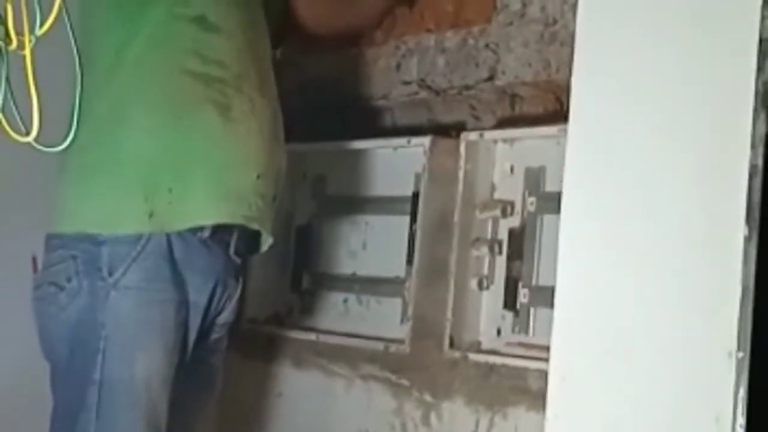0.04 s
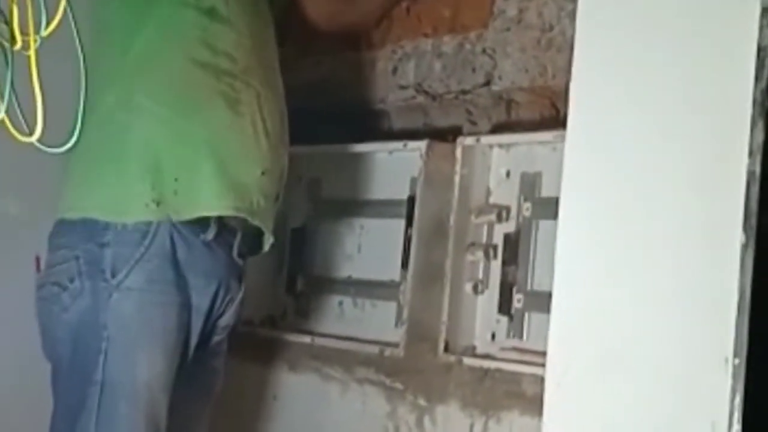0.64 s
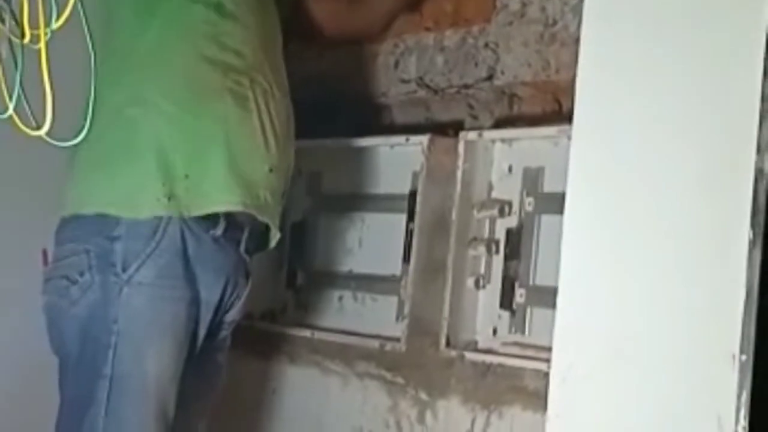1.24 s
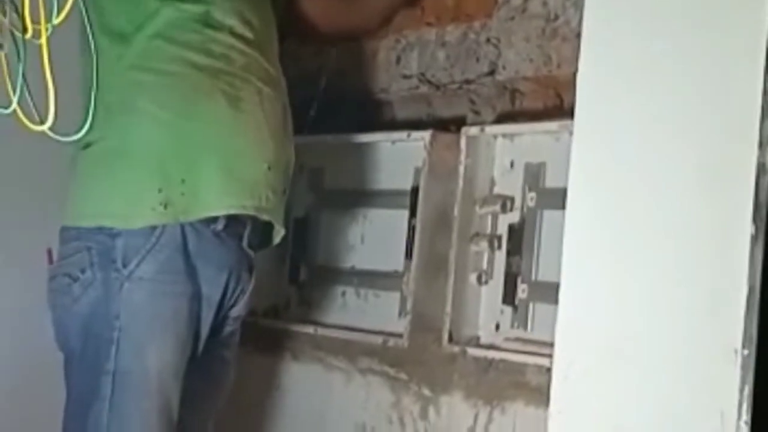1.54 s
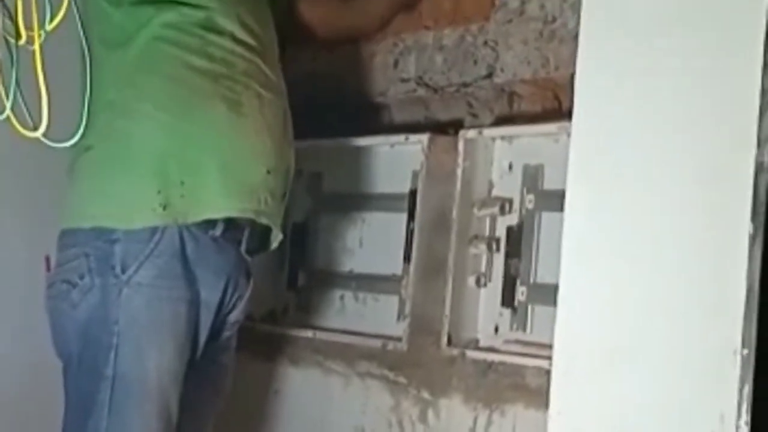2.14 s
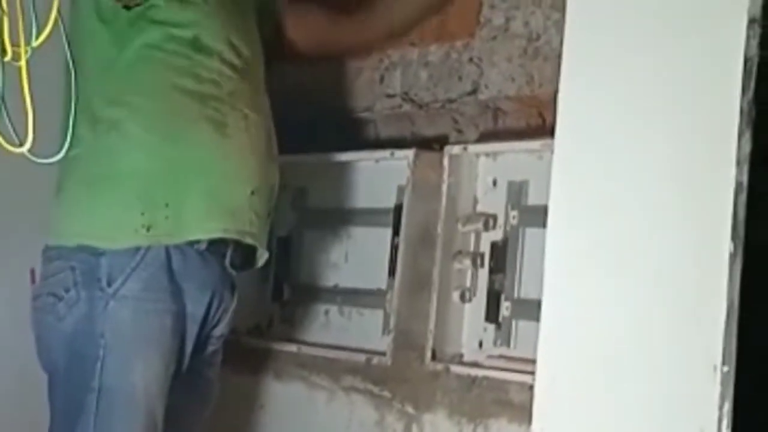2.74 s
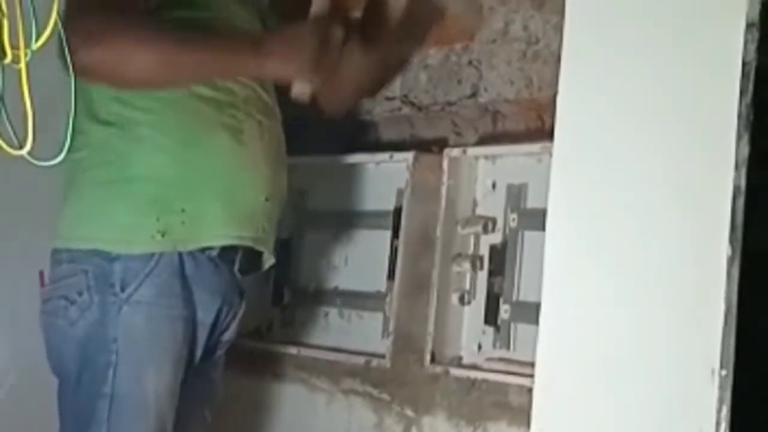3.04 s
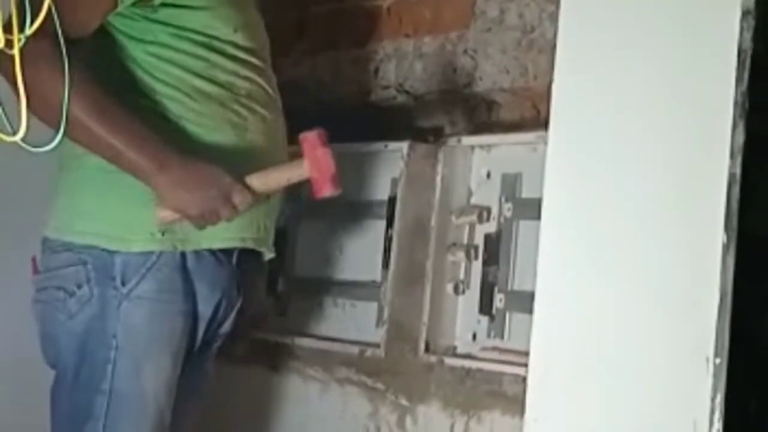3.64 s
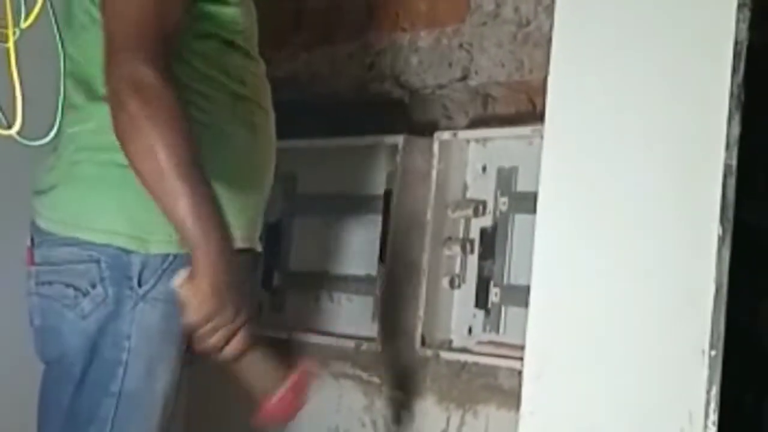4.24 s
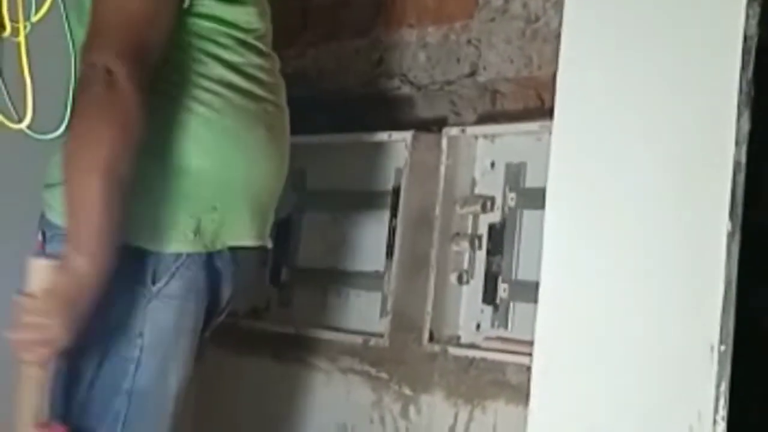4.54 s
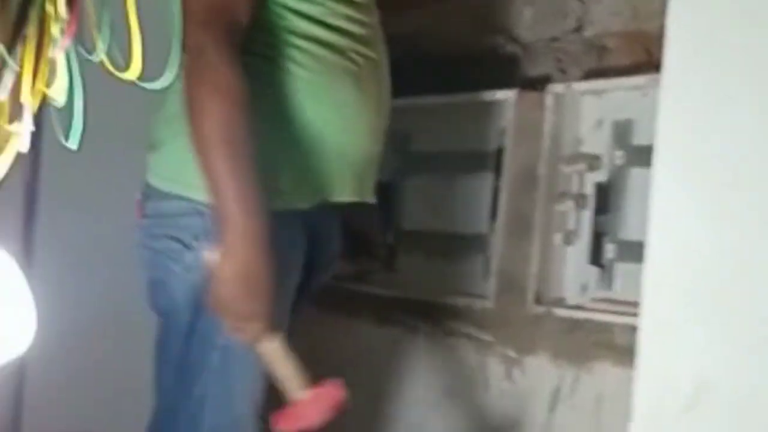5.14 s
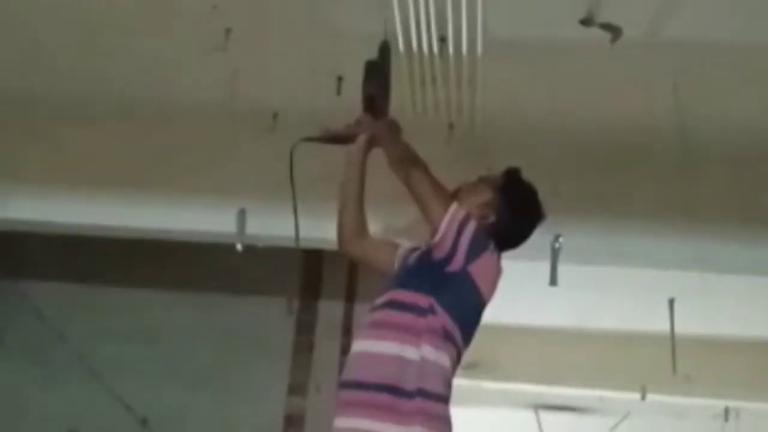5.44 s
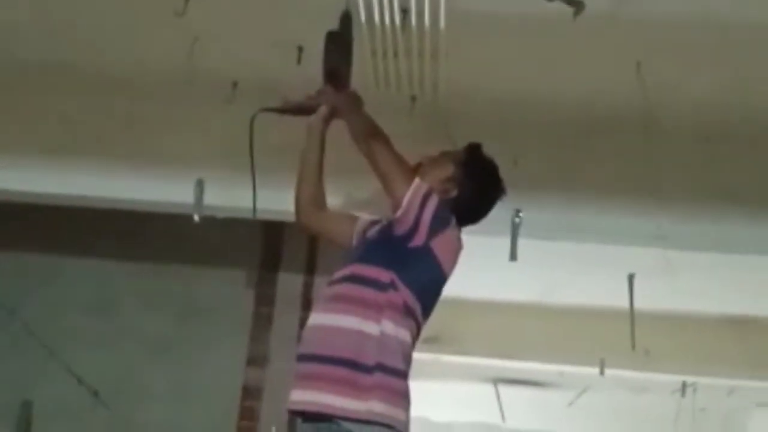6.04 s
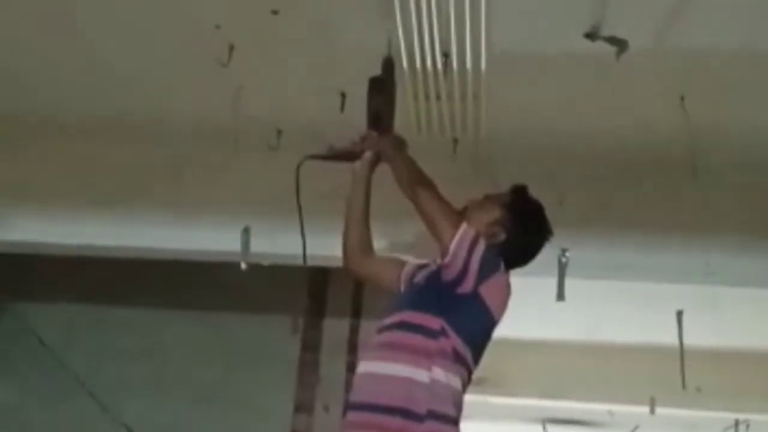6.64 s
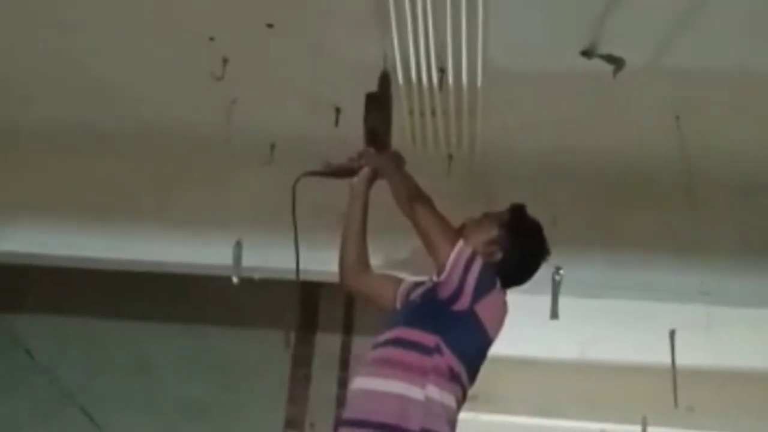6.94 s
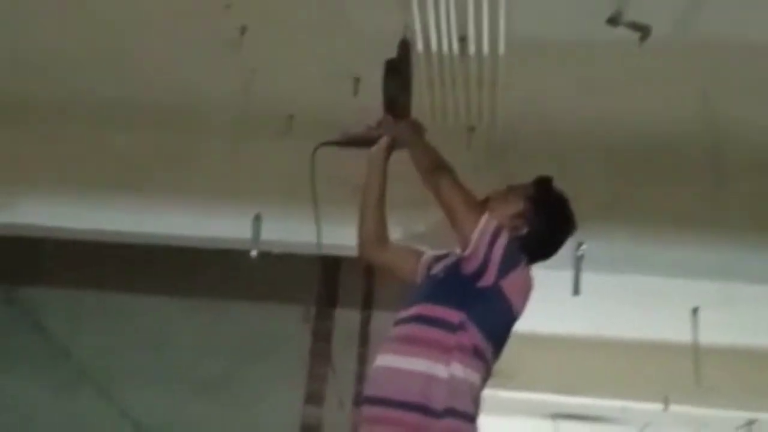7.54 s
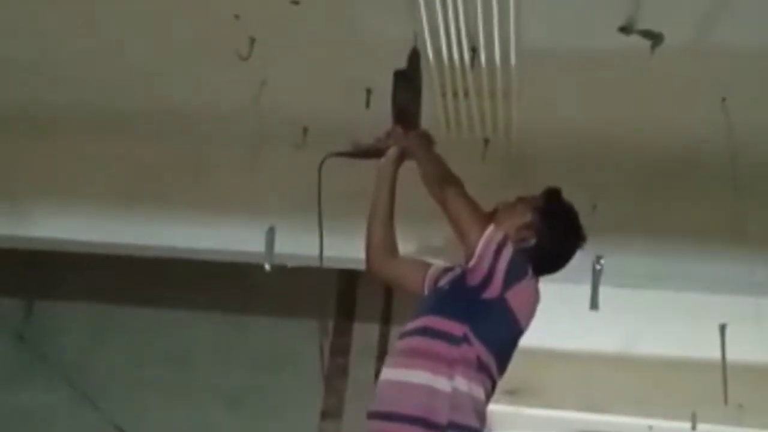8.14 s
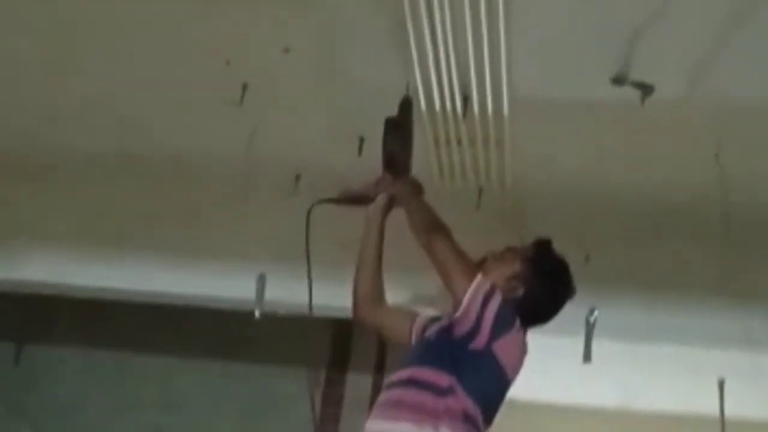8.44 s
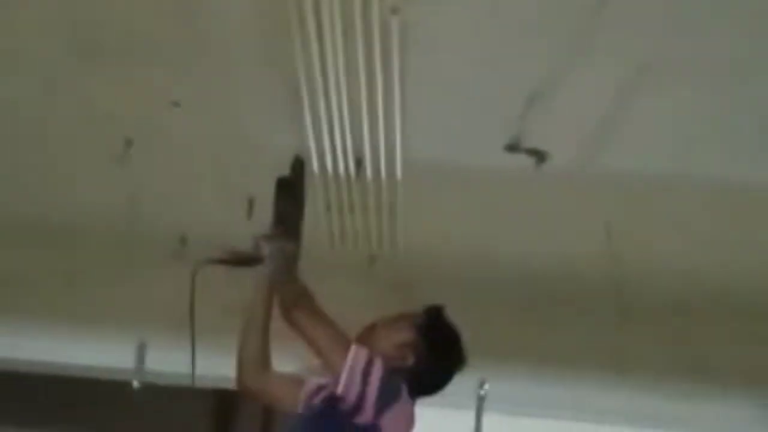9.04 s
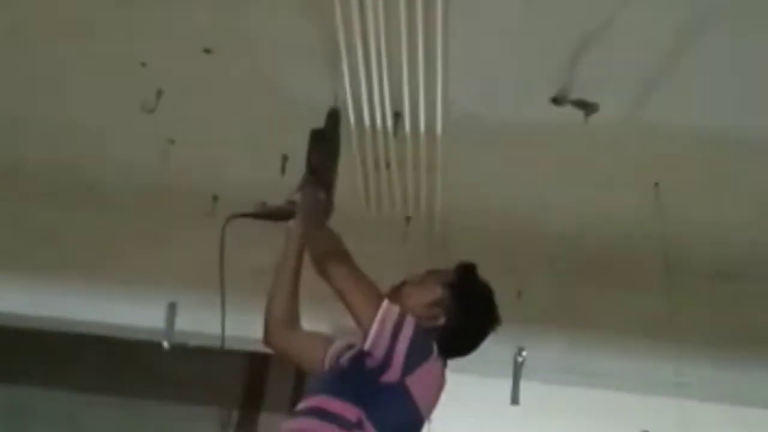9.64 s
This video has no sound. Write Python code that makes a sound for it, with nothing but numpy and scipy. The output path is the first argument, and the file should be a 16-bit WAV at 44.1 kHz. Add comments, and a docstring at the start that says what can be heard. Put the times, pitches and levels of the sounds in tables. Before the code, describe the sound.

Evenly spaced hammer blows on a steel chisel and a few tool clinks give way to the loud, buzzing rattle of a hammer drill.

```python
"""A lump hammer drives a steel chisel into a brick wall, heard from inside a bare, echoing room.
Each blow cracks the brick and rings the steel; mortar crumbs fall, tools clink and are lowered, and
the site rumbles in the distance. After an instant of silence the microphone is in a large hall, where
a hammer drill fades in on a concrete ceiling: about seventy blows a second, a buzz of their
harmonics, and the rush of motor and grinding bit."""
import sys
import numpy as np
from scipy import signal
from scipy.fft import rfft, irfft, next_fast_len
from scipy.io import wavfile

SR = 44100
rng = np.random.default_rng(int(sys.argv[2]) if len(sys.argv) > 2 else 0)


def pcm_store(signal):
    """Save signal as 16-bit PCM."""
    levels = np.round(np.clip(np.atleast_2d(signal), -1, 1) * 32767)
    wavfile.write(sys.argv[1], SR, levels.astype(np.int16).T)


N = 436590
TIME = np.arange(N) / SR
AGE = TIME[:2 * SR]   # seconds since a strike
ROOM_END_S, DRILL_START_S = 5.336, 5.375


def from_db(db):
    return 10 ** (np.asarray(db) / 20)


def unit_rms(x):
    return x / np.sqrt(np.mean(x ** 2) + 1e-20)


def at_hz(points, hz):
    """Read a table on a log-frequency axis."""
    freqs, values = np.transpose(points)
    return np.interp(np.log(np.maximum(hz, 1)), np.log(freqs), values)


def add(out, start_s, sound):
    """Mix a sound in from start_s."""
    start = round(start_s * SR)
    part = sound[max(-start, 0):N - start]
    out[max(start, 0):max(start, 0) + len(part)] += part


def colour(x, spectrum):
    """Causal (minimum-phase) filter that keeps the power of white noise."""
    size = 2 * next_fast_len(len(x) // 2 + SR // 10)
    gain = unit_rms(from_db(at_hz(spectrum, np.arange(size // 2 + 1) * SR / size)))
    cepstrum = irfft(np.log(gain))
    cepstrum[1:size // 2] *= 2
    cepstrum[size // 2 + 1:] = 0
    return irfft(rfft(x, size) * np.exp(rfft(cepstrum)))[:len(x)]


def resonate(x, hz, width_hz):
    """A resonance that keeps the power of white noise."""
    radius = np.exp(-np.pi * width_hz / SR)
    feedback = [1, -2 * radius * np.cos(2 * np.pi * hz / SR), radius ** 2]
    return signal.lfilter(np.sqrt((1 - radius ** 2) / 2) * np.array([1, 0, -1]), feedback, x + 1e-18)


def resonate_twice(x, hz, width_hz):
    """A steeper resonance with a higher peak."""
    return resonate(resonate(x, hz, width_hz), hz, width_hz)


def drift(per_s):
    """A line wandering through random points of spread 1."""
    knots = rng.standard_normal(int(per_s * N / SR) + 2)
    return np.interp(TIME * per_s, np.arange(len(knots)), knots)


def fade(t60_s):
    return np.exp(-np.log(1000) * np.minimum(AGE / t60_s, 3))


def attack(rise_s):
    return 1 - np.exp(-AGE / rise_s)


def burst(t60_s):
    """Noise that dies away."""
    return rng.standard_normal(len(AGE)) * fade(t60_s)


# The site in the distance: frequency_hz, relative_db
DIN_SPECTRUM = [(18, -53), (30, -29.5), (48, -28.5), (69, -14), (145, -5), (188, -11), (447, -16.5),
                (698, -15.5), (775, -14.5), (1750, -14), (4150, -33.5), (5990, -33.5), (9350, -50),
                (15800, -57)]
def site_din():
    """The building site reaches the microphone from far off as faint, steady noise."""
    return from_db(-56.5) * unit_rms(colour(rng.standard_normal(N), DIN_SPECTRUM))


# Reverberation of the bare room: frequency_hz, t60_s
ROOM_DECAY = [(60, 2.2), (250, 1.4), (700, 1.22), (1400, 1.05), (2700, 0.66), (5500, 0.59), (11000, 0.47),
              (16000, 0.17)]
def room_tail(hold_s, build_s):
    """Diffuse echoes build up, hold while the first reflections arrive, then die band by band."""
    white = rfft(rng.standard_normal(len(AGE)))
    hz = np.arange(len(white)) * SR / len(AGE)
    edges_hz = np.r_[0, np.geomspace(90, SR / 2, 15)]
    late_s = np.maximum(AGE - hold_s, 0)
    tail = np.zeros(len(AGE))
    for low, high in zip(edges_hz, edges_hz[1:]):
        band = irfft(white * (hz >= low) * (hz < high))
        tail += band * 10 ** (-3 * late_s / at_hz(ROOM_DECAY, (low + high) / 2))
    return tail * attack(build_s)


# The crack straight from the wall, and its echo around the room: frequency_hz, relative_db
CRACK_SPECTRUM = [(88, -49), (150, -23), (1050, -1), (1680, -27), (2080, 6.5), (2740, -5), (3260, 7),
                  (3880, 2.5), (4370, -10), (5850, 5.5), (8150, -21), (10900, -22), (13500, -41),
                  (15800, -14.5)]
ECHO_SPECTRUM = [(35, -34), (65, -9.5), (90, -11), (170, 0.5), (280, 2.5), (600, -5.5), (900, -4.5),
                 (1150, 0.5), (2200, -0.5), (2880, -2.5), (3500, 1), (4100, -11), (6200, -1.5), (7800, -21),
                 (10800, -21), (11800, -30.5), (13700, -33.5), (15600, -17)]
def brick_crack(crack_db):
    """Steel bites brick in a sharp burst; the room answers at the same level for every blow."""
    direct = colour(from_db(-7) * burst(0.015) + from_db(-9) * burst(0.057), CRACK_SPECTRUM)
    echo = colour(room_tail(hold_s=0.084, build_s=0.0025), ECHO_SPECTRUM)
    return from_db(crack_db) * direct + from_db(-28) * echo


# Modes of the brick and plaster around the chisel: pitch_hz, width_hz, relative_db
BRICK_MODES = [(487, 64, -4.5), (730, 45, -4), (1071, 50, -0.5), (1280, 170, -5.5), (2130, 240, 3.5),
               (2710, 88, -2), (3800, 110, -15)]
def brick_ring(shock):
    """The masonry rings, tuned a little differently at each blow."""
    return from_db(-42.2) * sum(from_db(db) * resonate(shock, hz * (1 + 0.0075 * rng.normal()), width_hz)
                                for hz, width_hz, db in BRICK_MODES)


# Modes of the free chisel bar: pitch_hz, relative_db
CHISEL_MODES = [(2369, -16), (3165, 0), (3467, -11), (3834, -11), (5778, -5), (5958, -6), (10490, -23)]
def chisel_ring(shock, wedged_db, free_db):
    """Gripped by the brick, the bar is stiffer and more damped; sprung free, it rings lower and purer."""
    return sum(from_db(db + wedged_db) * resonate(shock, hz * 1.048, width_hz=110)
               + from_db(db + free_db) * resonate(shock, hz, width_hz=27) for hz, db in CHISEL_MODES)


# Blows at the wall, with a gain per part: start_s, crack_db, thud_db, boom_db, wedged_db, free_db, ping_db
HAMMER_BLOWS = [(-0.385, -9, -38.5, -30, -29.5, -39.5, -43), (0.2629, -6.5, -39, -27, -37.5, -35.5, -42.5),
                (0.916, -3, -27, -28, -43, -45, -42.5), (1.5657, -4.5, -30, -39.5, -53.5, -42.5, -41),
                (2.1810, -4.5, -36.5, -26, -41, -43.5, -40.5), (2.7883, -7.5, -44, -38, -50.5, -27, -58)]
def hammer_on_chisel():
    """Each blow cracks the brick, rings the chisel and thumps the wall."""
    out = np.zeros(N)
    lowpass = signal.butter(2, 8500, fs=SR, output="sos")
    for start_s, crack_db, thud_db, boom_db, wedged_db, free_db, ping_db in HAMMER_BLOWS:
        crack = brick_crack(crack_db)
        # brick and chisel are shaken by the blow itself and by its echoes
        shock = room_tail(hold_s=0.056, build_s=0.0036) + from_db(9) * burst(0.094)
        ring = signal.sosfilt(lowpass, brick_ring(shock) + chisel_ring(shock, wedged_db, free_db))
        ping = from_db(ping_db - 18.5) * resonate_twice(shock, 10980, width_hz=290)   # steel on steel
        # the wall's low notes swell as the room's standing waves fill
        bloom = room_tail(hold_s=0.091, build_s=0.037)
        thud = from_db(thud_db - 27.5) * resonate_twice(bloom, 215, width_hz=90)
        boom = from_db(boom_db - 24.5) * resonate_twice(bloom, 372, width_hz=130)
        add(out, start_s, crack + ring + ping + thud + boom)
    return out


# A small, dry contact in the room: frequency_hz, relative_db
CHIP_SPECTRUM = [(100, -15.5), (400, 8), (1500, 5.5), (3500, 6.5), (5200, 4), (7500, -2), (10000, -12.5),
                 (13000, -24.5), (15500, -9)]
def mortar_crumbs():
    """Grit shaken loose by each blow patters down over the next second."""
    grains_per_s = 30 * sum(np.exp(-((TIME - blow_s - 0.6) / 0.4) ** 2) for blow_s, *_ in HAMMER_BLOWS)
    landings = rng.random(N) < grains_per_s / SR
    grains = landings * from_db(2.2 * np.minimum(rng.exponential(1, N), 3)) * rng.choice([-1, 1], N)
    patter = signal.fftconvolve(grains, burst(0.004) + from_db(-10.5) * burst(0.2))[:N]
    return from_db(-55) * colour(patter, CHIP_SPECTRUM)


# Light touches on the chisel as it is reseated: start_s, pitch_hz, level_db, t60_s
CHISEL_TOUCHES = [(0.22, 3220, -50, 0.22), (0.66, 5800, -50, 0.19), (0.76, 2710, -58, 1),
                  (0.852, 2700, -50, 1.3), (0.917, 2690, -42, 1.1), (1.339, 3310, -42.5, 0.084),
                  (1.345, 3460, -59.5, 1.4), (2.563, 2390, -43.5, 0.21), (3.281, 7300, -44, 0.15),
                  (3.292, 3180, -43, 0.18), (3.459, 5130, -45, 0.11), (4.011, 5300, -56, .16),
                  (4.255, 4540, -61.5, .12)]
def chisel_clinks():
    """Each touch sets one mode of the loose chisel singing; the shorter the ring, the rougher."""
    out = np.zeros(N)
    for start_s, hz, db, t60_s in CHISEL_TOUCHES:
        envelope = from_db(db + 1.5 * drift(30)[:len(AGE)]) * fade(t60_s) * attack(0.0025)
        roughness = 0.8 * drift(25 / t60_s)[:len(AGE)]
        add(out, start_s, envelope * np.sin(2 * np.pi * hz * AGE + roughness))
    return out


# Tools and chips landing in the room: start_s, level_db, pitch_hz, body_db, room_db, slide_db
CONTACTS = [(0.832, -51, 2680, 4, -10, -13), (1.4836, -50, 3000, 6, -31, -9),
            (1.889, -43.5, 2000, -7, -16, -8), (2.0125, -51, 6030, -12.5, -21, -14),
            (2.1118, -48.5, 1670, 22, -25, -6.5), (2.5612, -43, 2400, -13, -24, -2),
            (2.7418, -46, 2170, 10, -27, -5), (3.102, -33.5, 1960, 2, -19, -5.5),
            (3.279, -34.5, 3650, -6, -12, -0.5), (3.455, -38.5, 1980, -2, -13, -11),
            (3.5405, -36, 1404, 16, -17, -17), (3.5483, -35.5, 1630, 3, -16.5, -3.5),
            (3.659, -48, 1700, -3, -13, -6), (3.759, -49, 1800, -8.5, -8.5, -17),
            (4.0108, -46.5, 4800, -3, -10, -0.5)]
def tool_and_chip_knocks():
    """Dry contacts with one broad resonance each, a short slide over grit, and their echo."""
    out, tail = np.zeros(N), room_tail(hold_s=0.0072, build_s=0.005)
    for start_s, db, hz, body_db, room_db, slide_db in CONTACTS:
        slide = burst(0.15) * attack(0.0037) * from_db(4 * drift(500)[:len(AGE)])
        contact = colour(burst(0.025) + from_db(slide_db) * slide + from_db(room_db) * tail, CHIP_SPECTRUM)
        body = resonate_twice(contact, hz, width_hz=1100)
        add(out, start_s, from_db(db) * (contact + from_db(body_db - 21) * body))
    return out


# The striker, straight from drill to microphone: frequency_hz, relative_db
TICK_SPECTRUM = [(1000, -13), (2300, 2), (4500, -5.5), (7000, -11), (9000, -7.5), (13700, -8), (15000, 2)]
def striker_ticks(hits):
    """Each hit of the striker gives a dry tick of noise."""
    envelope = signal.fftconvolve(hits, fade(0.0042) + 0.1 * fade(0.015))[:N]
    return unit_rms(colour(envelope * rng.standard_normal(N), TICK_SPECTRUM))


def flute_whines(per_s=240, low_hz=2597, high_hz=12480):
    """Grit catching in the flutes sets off brief, thin rings of steel; rms 1 while the drill runs."""
    out, age = np.zeros(N), AGE[:SR // 4]
    envelope = (fade(0.24) * attack(0.008))[:len(age)]
    running_s = TIME[-1] - DRILL_START_S
    for when, pitch, strength in rng.random((int(per_s * running_s), 3)):
        hz = low_hz + pitch * (high_hz - low_hz)
        add(out, DRILL_START_S + when * running_s, strength * envelope * np.sin(2 * np.pi * hz * age))
    return out / out[TIME > DRILL_START_S].std()


# Bit and concrete as the hall returns them: frequency_hz, relative_db
RATTLE_SPECTRUM = [(40, -40), (120, -21.5), (250, -20.5), (420, -17.5), (700, -11.5), (1100, -6),
                   (1800, -5), (2400, -1), (3100, -9.5), (4400, -16.5), (6100, -12), (7200, -16.5),
                   (8300, -27), (13700, -33), (15000, -28.5)]
def hall_rattle(hits, cycles):
    """The hall smears each blow's sharp edge into a rattle, over whines and the rush of fan and dust."""
    edges = signal.sosfilt(signal.butter(4, 1700, "high", fs=SR, output="sos"), hits)
    echoes = unit_rms(signal.fftconvolve(edges, burst(0.84))[:N])
    pulsing = 1 + 0.15 * np.exp(-(cycles % 1) / 0.09)
    rush = rng.standard_normal(N) * from_db(1.4 * drift(40)) * pulsing
    wash = unit_rms(from_db(1) * echoes + rush) + from_db(-10.5) * flute_whines()
    return colour(wash, RATTLE_SPECTRUM)


def rub(hz, width_hz, flutter_db):
    """Unsteady friction heard through one steep resonance."""
    friction = rng.standard_normal(N) * from_db(flutter_db * drift(22))
    return unit_rms(resonate_twice(friction, hz, width_hz))


# Modes of the drill's steel that flare as the bit catches: pitch_hz, width_hz, relative_db
STEEL_MODES = [(2420, 260, -12), (2650, 24, -20.5), (2810, 23, -21), (3180, 110, -20), (3620, 42, -22.5),
               (5350, 140, -22), (5970, 100, -21), (6720, 160, -22)]
def grinding_bit():
    """The bit squeals in its hole, grinds on stones and sets the slab droning; its steel rings in flares."""
    halfway_s = (DRILL_START_S + TIME[-1]) / 2
    stone_catch_db = 1.6 * np.exp(-((TIME - 9.5) / 0.3) ** 2)
    bite_db = 0.48 * (TIME - halfway_s) + stone_catch_db   # it bites harder as it sinks in
    squeal = from_db(-6.5 + 1.9 * bite_db) * rub(2217, width_hz=340, flutter_db=2.5)
    grind = from_db(-13.5 + 3.1 * bite_db) * rub(1610, width_hz=930, flutter_db=4.5)
    drone = from_db(-18.5) * rub(1040, width_hz=240, flutter_db=1.5)
    flares = sum(from_db(db + 3 * drift(9)) * resonate(rng.standard_normal(N), hz, width_hz)
                 for hz, width_hz, db in STEEL_MODES)
    return squeal + grind + drone + flares


# Buzz of the blows and hum of the housing: blow_rate_multiple, relative_db
BUZZ_HARMONICS = [(1, -22), (2, -6), (6, -12.5), (7, -16), (8, -5.5), (9, -8), (10, -5.5), (11, -11),
                  (12, -5.5), (13, -3.5), (14, -5), (15, -5.5), (16, -4.5), (17, -1.5), (18, -3.5),
                  (19, -9.5), (20, -5), (21, -1), (22, -2), (23, 0), (24, -1), (25, -2), (26, 3.5)]
HOUSING_PARTIALS = [(1, -18), (3, -2.5), (4, -2), (5, 0), (5.25, -3.5)]
# Shape of the hum's rise and fall: time_s, relative_db
HOUSING_CONTOUR = [(5.9, -51), (6.05, -55), (7.22, -53.5), (7.75, -50), (8.58, -49.5), (9.8, -55)]
# Standing waves of the hall at the microphone: start_s, end_s, rise_db, blow_rate_multiple
STANDING_WAVES = [(5.295, 9.2, 12.5, 6), (5.4, 6.498, 7, 8), (5.4, 6.6, 6.5, 21), (5.7, 7.2, 5.5, 1),
                  (6.15, 7.15, 10, 14), (6.4, 7.05, 5, 10), (7.0, 8.1, 9, 13), (7.1, 7.65, 5.5, 8),
                  (7.45, 8.75, 6, 24), (8.05, 9.05, 12.5, 9), (8.5, 9.152, 13, 15), (8.7, 9.3, 15.5, 14),
                  (8.75, 9.999, 9.5, 16), (9.25, 10, 4, 2), (9.35, 10, 12, 20)]
def harmonic_buzz(cycles, mean_rate_hz, swell_edge_s=0.31):
    """Regular blows make wavering harmonics below 2 kHz; standing waves lift some for a while."""
    contour_db = np.interp(TIME, *np.transpose(HOUSING_CONTOUR))
    hum_db = -8 + 1.55 * (contour_db - contour_db[TIME > DRILL_START_S].mean())
    hum_partials = [(multiple, db + hum_db) for multiple, db in HOUSING_PARTIALS]
    out = np.zeros(N)
    for multiple, db in hum_partials + BUZZ_HARMONICS:
        hz = multiple * mean_rate_hz
        unrest = np.sqrt(hz / 1400)   # higher harmonics waver deeper and faster
        for start_s, end_s, rise_db, lifted_multiple in STANDING_WAVES:
            if lifted_multiple == multiple:
                swell = np.clip(0.5 + np.minimum(TIME - start_s, end_s - TIME) / swell_edge_s, 0, 1)
                db = db + rise_db * swell
                # the noise around the harmonic rises with it
                out += swell * unrest * from_db(db - 9.5) * rub(hz, width_hz=69, flutter_db=2)
        waver_db = 3 * unrest * drift(4.5 * unrest)
        phase = 2 * np.pi * (multiple * cycles + rng.random()) + 0.7 * unrest * drift(7.5)
        out += from_db(db + waver_db) * np.sin(phase)
    return out


# Pace of the drill against the ceiling: time_s, blow_rate_hz
BLOW_RATE = [(5.6, 69.8), (5.87, 70.8), (6.42, 70.4), (6.59, 70.0), (7.62, 70.8), (8.61, 71.2),
             (9.27, 70.9), (9.47, 70.6), (9.8, 70.9)]
def hammer_drill(fade_in_s=0.28):
    """The striker hits once a cycle, slightly uneven in time and force, while the bit grinds on."""
    rate_hz = np.interp(TIME, *np.transpose(BLOW_RATE))
    cycles = np.cumsum(rate_hz * (1 + 0.0012 * drift(14))) / SR
    hit_count = np.floor(cycles + 0.006 * drift(70))
    hits = np.diff(hit_count, prepend=0).clip(0, 1) * from_db(1.9 * drift(70))
    ticks = from_db(-15) * striker_ticks(hits)
    rattle = from_db(-1) * hall_rattle(hits, cycles)
    bit = from_db(-3) * grinding_bit()
    buzz = from_db(-17.5) * harmonic_buzz(cycles, rate_hz.mean())
    fade_in = np.clip(0.06 + (TIME - DRILL_START_S) / fade_in_s, 0, 1)
    return from_db(-28.5) * fade_in * (ticks + rattle + bit + buzz)


def scene():
    """One microphone: chiselling in the bare room, an instant of silence, then drilling in the hall."""
    room = site_din() + hammer_on_chisel() + tool_and_chip_knocks() + chisel_clinks() + mortar_crumbs()
    return (room * (TIME < ROOM_END_S) + hammer_drill() * (TIME > DRILL_START_S))[None]


def record(dry):
    """Peaks are rounded and the top is cut steeply at 15.75 kHz."""
    lowpass = signal.ellip(12, 0.2, 80, 15750, fs=SR, output="sos")
    return signal.sosfilt(lowpass, np.tanh(dry))


dry = scene()
out = record(dry)
pcm_store(out)
```